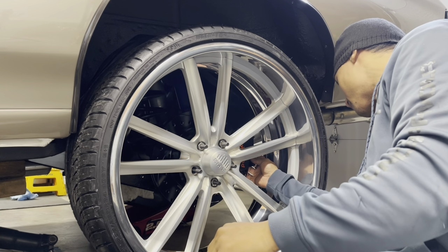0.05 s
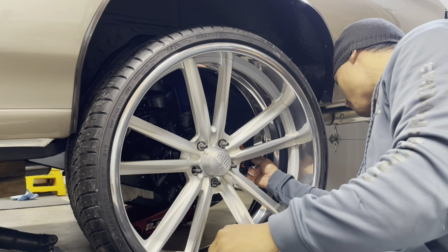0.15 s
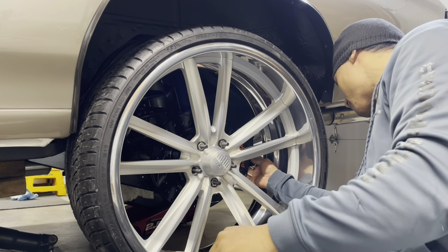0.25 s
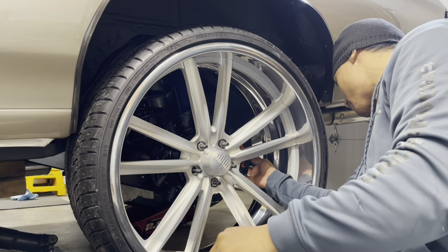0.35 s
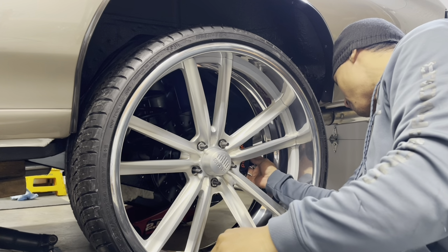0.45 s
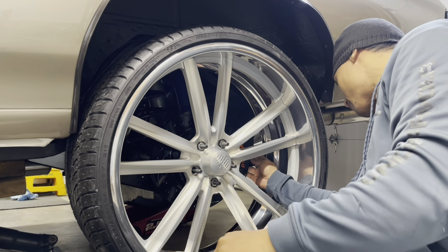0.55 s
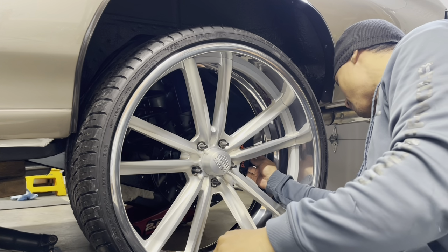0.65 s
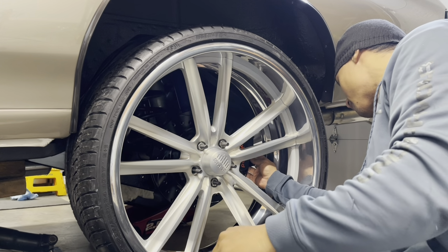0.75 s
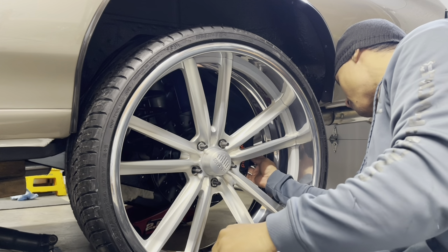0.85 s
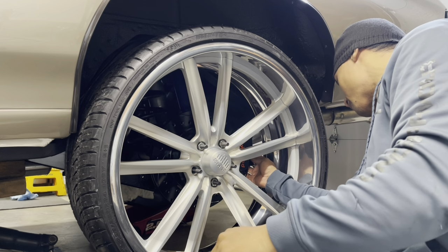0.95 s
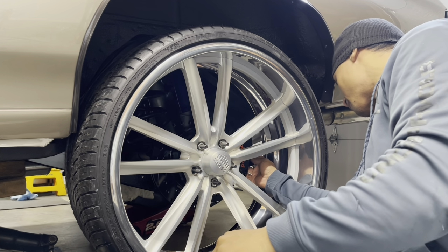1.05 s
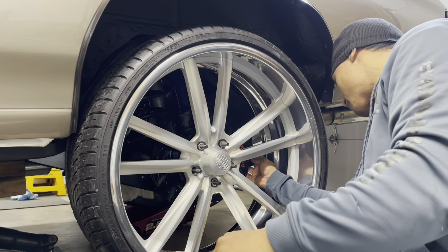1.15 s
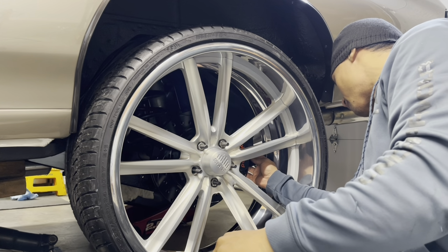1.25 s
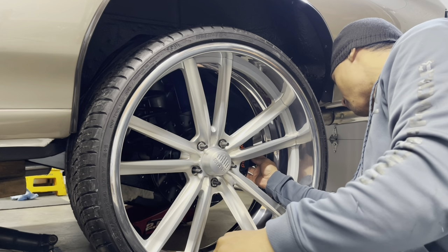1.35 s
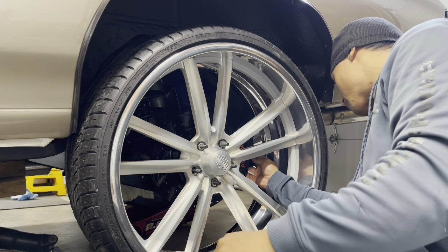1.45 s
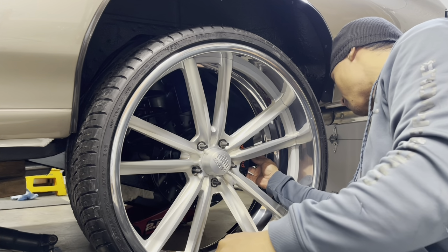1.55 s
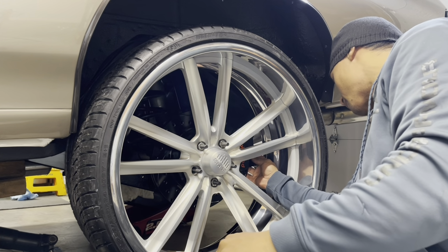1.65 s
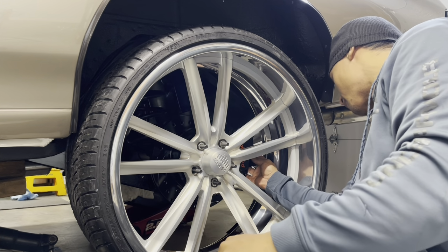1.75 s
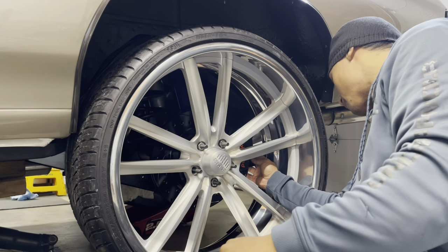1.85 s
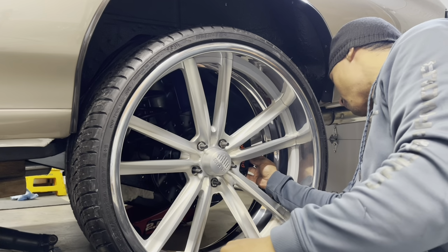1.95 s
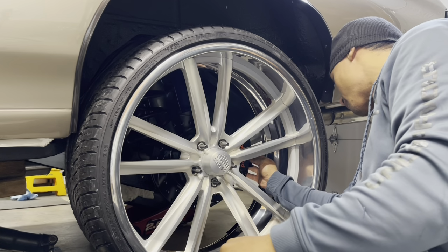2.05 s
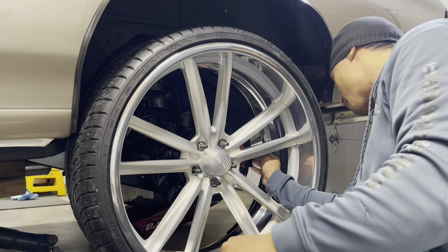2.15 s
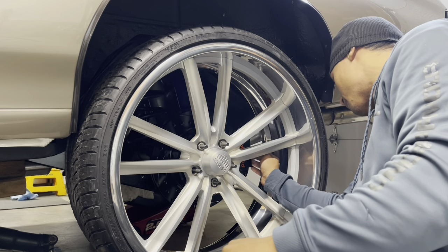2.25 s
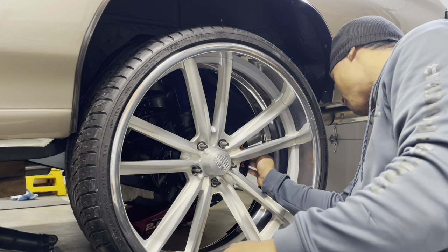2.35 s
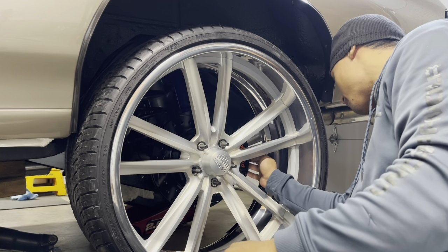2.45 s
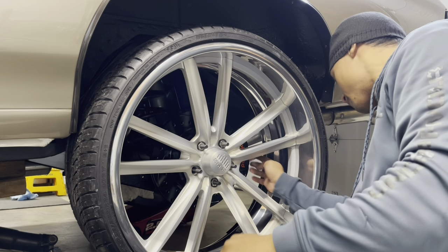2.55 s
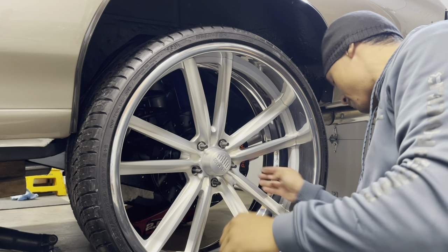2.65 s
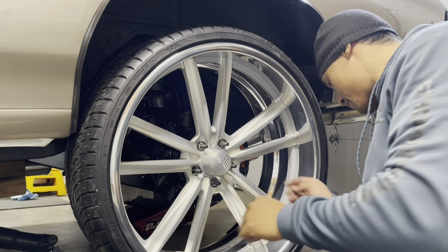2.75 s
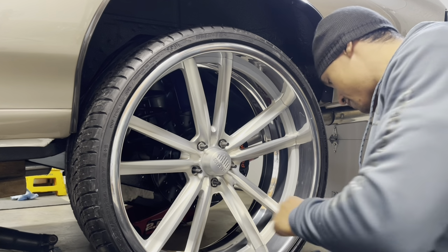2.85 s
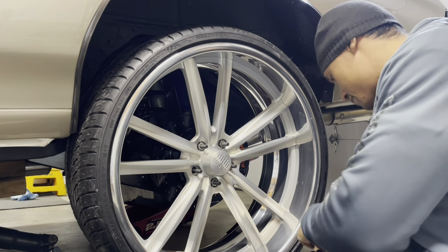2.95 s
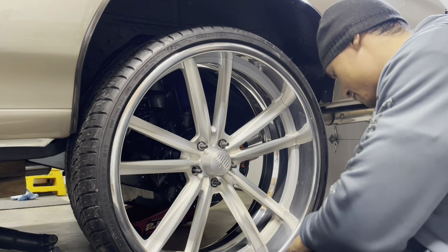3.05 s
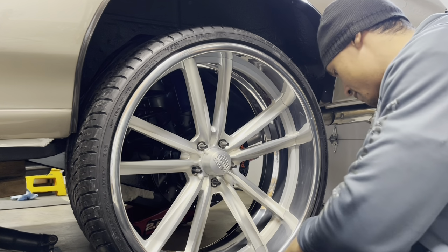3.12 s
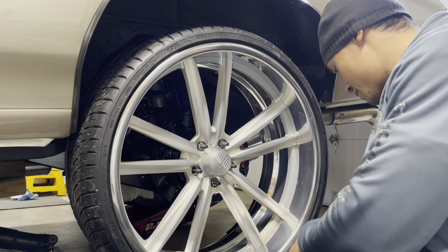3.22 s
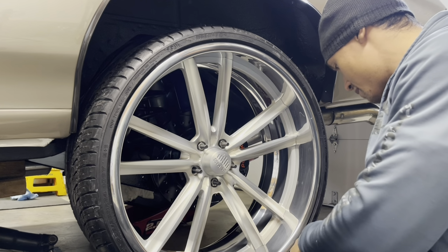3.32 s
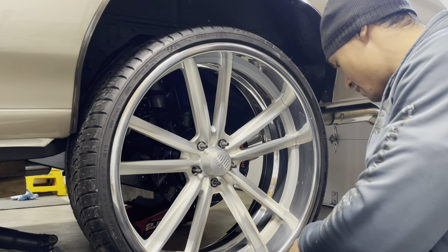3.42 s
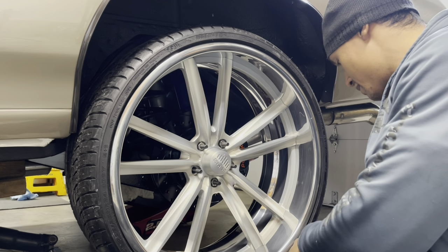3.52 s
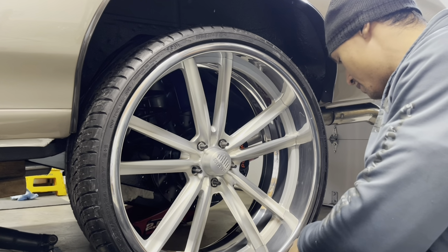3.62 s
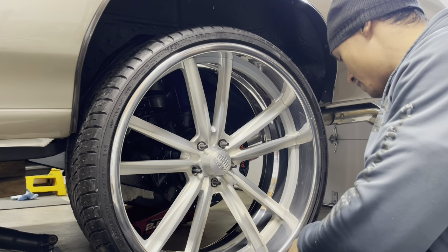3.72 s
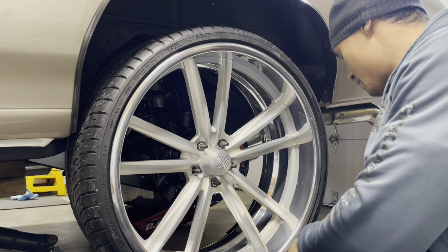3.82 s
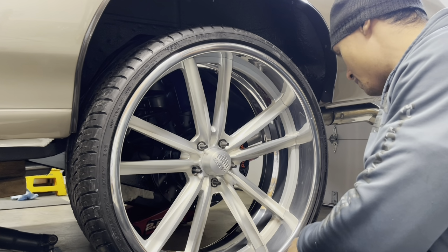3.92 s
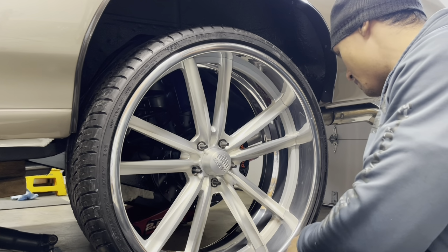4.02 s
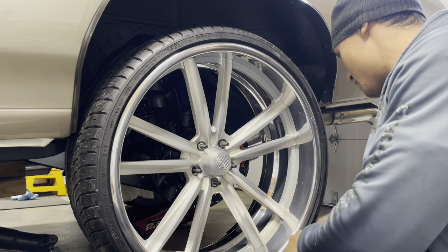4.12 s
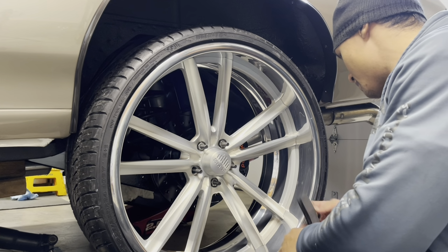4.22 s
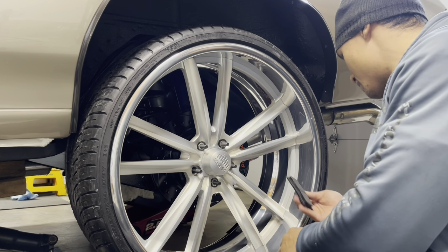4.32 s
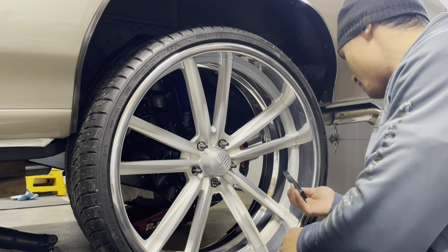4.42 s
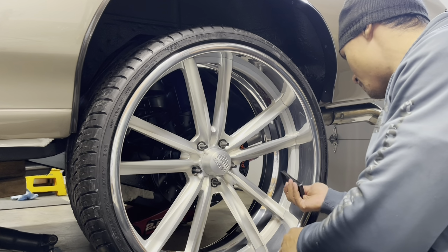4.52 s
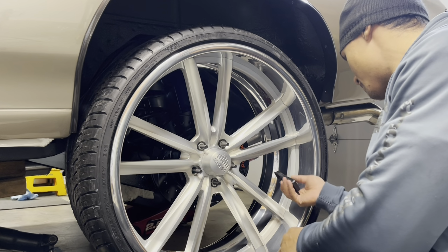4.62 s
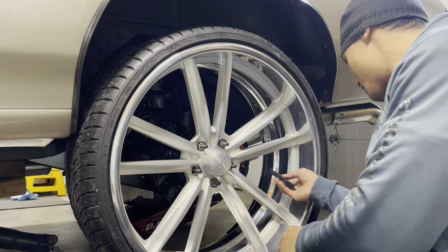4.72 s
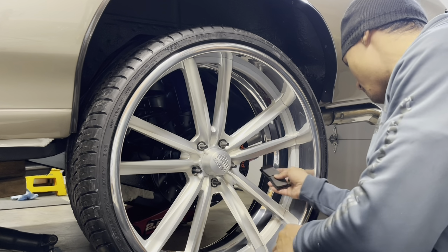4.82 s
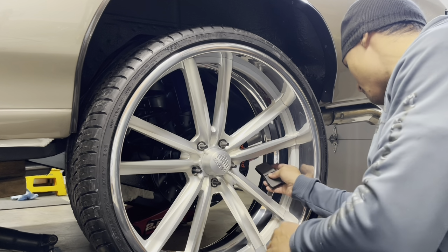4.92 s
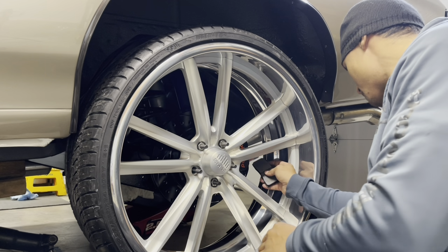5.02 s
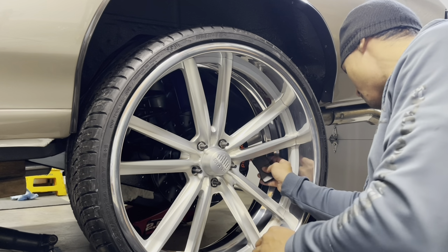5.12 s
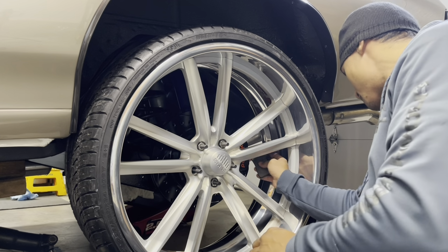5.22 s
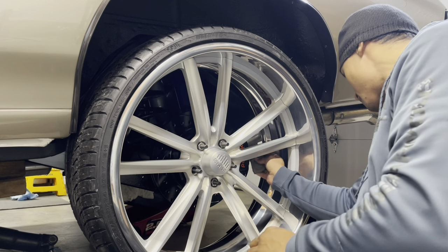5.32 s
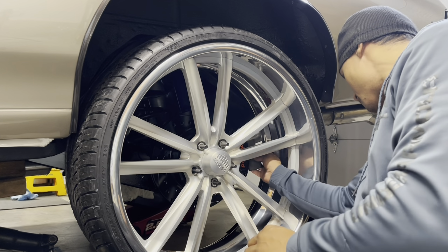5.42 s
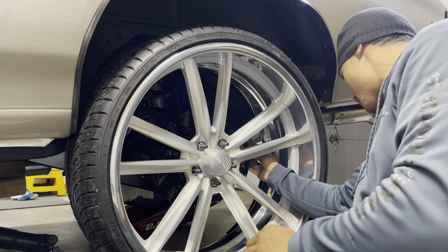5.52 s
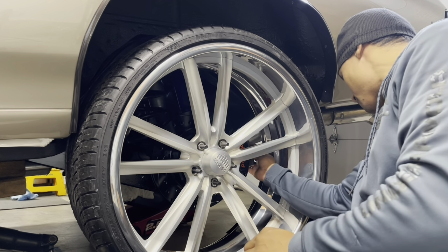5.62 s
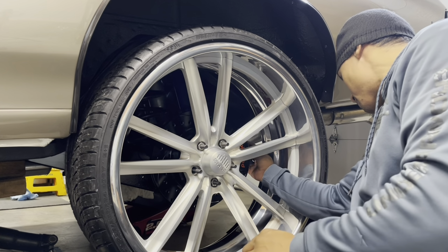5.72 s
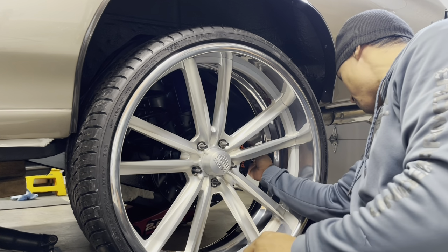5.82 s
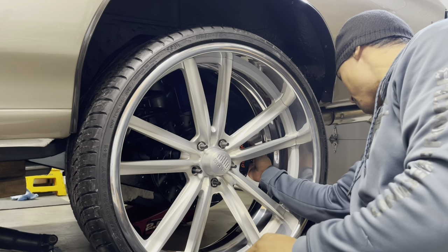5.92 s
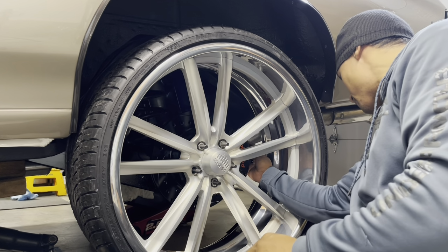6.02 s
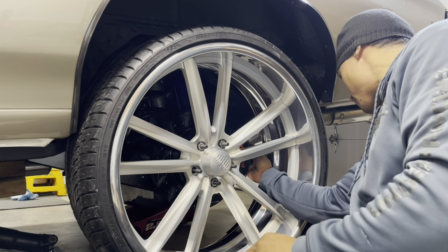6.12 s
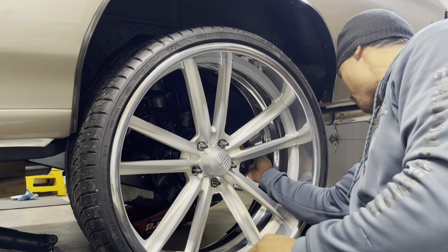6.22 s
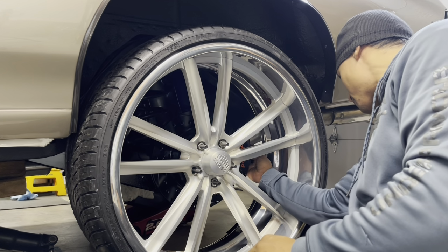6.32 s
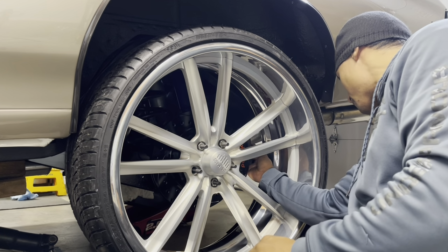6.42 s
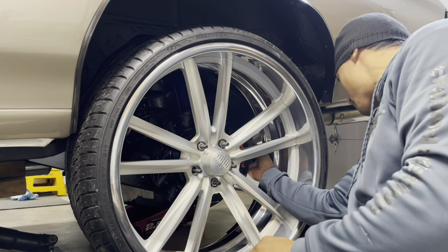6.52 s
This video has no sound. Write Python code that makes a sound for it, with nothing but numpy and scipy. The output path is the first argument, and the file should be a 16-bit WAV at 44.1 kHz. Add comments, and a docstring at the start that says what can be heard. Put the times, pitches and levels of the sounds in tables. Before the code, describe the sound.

In a quiet humming garage, metal parts tick and knock behind a wheel, ring out once loudly, rub softly, then clunk into place.

```python
"""A steel crack and a low drone over room hum, then knocks, thuds, clinks and rubs: a hand works brake
pads into a caliper behind a large alloy wheel in a quiet garage. Blows are noise bursts plus damped
modes; pushes swell the lowest disc mode; a heavy knock rings the wheel on its hub.
Sleeve, sliding pad and floor scrape are grainy filtered noise; the hum is shaped stereo noise."""
import sys
import numpy as np
from scipy import signal
from scipy.fft import rfft, irfft, next_fast_len
from scipy.io import wavfile
from scipy.ndimage import uniform_filter1d, map_coordinates

SR = 44100
rng = np.random.default_rng(int(sys.argv[2]) if len(sys.argv) > 2 else 0)


def put_to_file(sound):
    """Save the sound as 16-bit audio at rate SR, in the file named by the first command-line argument."""
    columns = np.atleast_2d(sound).T  # one column per channel
    safe = np.clip(columns, -1, 1)
    whole_steps = np.round(safe * 32767)
    wavfile.write(sys.argv[1], SR, whole_steps.astype(np.int16))


N = 289737


def amp(db):
    """dB to gain."""
    return 10 ** (np.asarray(db) / 20)


def unit(x):
    """x at rms 1."""
    return x / np.sqrt(np.mean(x ** 2) + 1e-20)


def along(points, hz):
    """Interpolate (frequency [Hz], value) points on a log frequency axis."""
    f, value = np.transpose(points)
    return np.interp(np.log(hz + 1), np.log(f + 1), value)


def filtered(x, response):
    """Multiply the spectrum of x by a complex response of frequency."""
    n = x.shape[-1]
    m = next_fast_len(n + 8192)
    hz = np.fft.rfftfreq(m, 1 / SR)
    return irfft(rfft(x, m) * response(hz), m)[..., :n]


def stroke(start_s, rise_s, hold_s, t60_s):
    """Envelope of peak 1: smooth swell, hold, exponential fade."""
    t = np.arange(N) / SR - start_s
    swell = np.sin(np.pi / 2 * np.clip(t / rise_s, 0, 1)) ** 2
    fade_time = np.clip(t - rise_s - hold_s, 0, None)
    return swell * amp(-60 * fade_time / t60_s)


def pair(n, spectrum, alike):
    """Diffuse stereo noise of rms 1: the mid/side balance sets the left-right likeness."""
    def mid_side(hz):
        turn = np.arccos(along(alike, hz)) / 2
        return amp(along(spectrum, hz)) * np.array([np.cos(turn), np.sin(turn)])

    mid, side = filtered(rng.standard_normal((2, n)), mid_side)
    return unit(np.array([mid + side, mid - side]))


# Room hum: (frequency [Hz], relative density [dB per Hz])
HUM_SPECTRUM = [(20, -38), (40, -11.5), (60, 0), (100, -6.5), (120, -3), (230, -9.5), (420, -13),
                (560, -18.5), (1150, -24.5), (1780, -27), (2400, -35.5), (3300, -42.5), (6000, -49.5),
                (9000, -50.5), (12500, -48)]
# Hum stereo: (frequency [Hz], left-right likeness [-1..1])
HUM_ALIKE = [(60, 0.94), (170, 0.94), (490, -0.092), (1390, 0.1), (3970, -0.2), (11300, -0.022)]
HUM_DB = -58


def room_hum():
    """Steady shaped noise, alike at both ports in the bass and diffuse above; slightly louder left."""
    return amp(HUM_DB) * pair(N, HUM_SPECTRUM, HUM_ALIKE) * amp([[.7], [-.7]])


# Port phase: (frequency [Hz], lead of the left port [rad])
PORT_LEAD = [(500, 0.72), (1800, 1.38), (2800, 0.85), (5000, 1), (7000, -0.3), (7900, -2.5), (9900, 6.5),
             (11500, -1.5)]


def ports(x):
    """Direct sound reaches the two microphone ports a little apart in time and level."""
    half_lead = np.array([[.5j], [-.5j]])
    return filtered(x, lambda hz: amp([[1.1], [-1.1]]) * np.exp(half_lead * along(PORT_LEAD, hz)))


# Room decay: (frequency [Hz], decay time t60 [s])
ROOM_T60 = [(200, 0.43), (1000, 0.26), (3000, 0.23), (7000, 0.3), (12000, 0.051)]
# Room tail stereo: (frequency [Hz], left-right likeness [-1..1])
ECHO_ALIKE = [(100, 0.87), (200, 0.7), (340, 0.8), (600, 0.25), (1200, 0.78), (3000, 0.071), (9000, 0.17)]


def garage(x, wet_db):
    """Convolve with a fresh diffuse tail; each frequency dies at its own speed."""
    noise = ports(pair(SR // 2, [(100, 0)], ECHO_ALIKE))
    hz, t, bins = signal.stft(noise, SR, nperseg=256)
    decay = amp(-60 * t / along(ROOM_T60, hz)[:, None])
    tail = signal.istft(bins * decay, SR, nperseg=256)[1]
    tail = np.pad(tail, ((0, 0), (180, 0))) / np.linalg.norm(tail[0])  # delay in samples
    return amp(wet_db) * signal.fftconvolve(x[None], tail, axes=1)[:, :len(x)]


def friction(envelope, spectrum, grain_db):
    """Rubbing: shaped noise of small uneven grains under the stroke."""
    unevenness = unit(uniform_filter1d(rng.standard_normal(N), size=90))
    grains = rng.standard_normal(N) * amp(grain_db * unevenness)
    return envelope * unit(filtered(grains, lambda hz: amp(along(spectrum, hz))))


# Sleeve strokes: (start [s], swell [s], fine hiss level [dB], duller rub level [dB])
SLEEVE_STROKES = [(2.599, 0.34, -76, -77.5), (3.639, 0.029, -72.5, -76), (4.071, 0.1, -79, -81.5),
                  (4.631, 0.22, -76.5, -71), (5.14, 0.15, -76.5, -78.5)]
# Cloth noise: (frequency [Hz], relative density [dB per Hz])
CLOTH = [(2000, -4), (4000, -7.5), (7000, -17), (9000, 6.5), (11000, 3.5), (12500, -18.5)]
SLEEVE_T60_S = 0.68


def sleeve():
    """The sleeve brushes the wheel: a fine hiss and a coarser, duller rub."""
    hiss, rub = sum(amp([[fine_db], [dull_db]]) * stroke(s, swell_s, 0, SLEEVE_T60_S)
                    for s, swell_s, fine_db, dull_db in SLEEVE_STROKES)
    dull_cloth = [(900, -22.5)] + CLOTH[:3] + [(9000, -42)]
    return friction(hiss, CLOTH[2:], grain_db=-1.0) + friction(rub, dull_cloth, grain_db=2.0)


# Pad dragged on concrete: (start [s], bite [s], level [dB])
SCRAPE = (3.14, 0.02, -61)
# Scrape noise: (frequency [Hz], relative density [dB per Hz])
GRIND = [(400, -17), (900, -1.5), (1150, -6.5), (1380, 0.5), (1700, -9.5), (2400, -9.5), (3240, -15),
         (6000, -24), (9000, -17), (12000, -29)]
SCRAPE_HOLD_S, SCRAPE_T60_S = 0.055, 0.59


def floor_scrape():
    """The pad bites the floor and drags: coarse grainy noise."""
    s, bite_s, db = SCRAPE
    drag = amp(db) * stroke(s, bite_s, SCRAPE_HOLD_S, SCRAPE_T60_S)
    return friction(drag, GRIND, grain_db=2)


# Pad slid along the disc: (start [s], swell [s], hold [s], level [dB])
SLIDES = [(3.226, 0.057, 0.19, -65), (5.132, 0.09, 0.056, -66.5)]
# Disc modes: (frequency [Hz], relative level [dB], decay time t60 [s])
DISC = [(791, -2, .06), (1020, -6, .07), (1791, 2, .13), (2400, -4, .04), (2665, -2, .08), (3650, -1, .1),
        (3828, -1, .09), (4760, -5, .08), (8100, -4, .08)]
SLIDE_T60_S, SLIDE_WIDTH_HZ, SLIDE_HISS_DB = 0.77, 80, -13


def pad_slide():
    """Friction noise makes three upper disc modes sing as resonances over a hiss."""
    def sings(f):
        modes = (DISC[2], *DISC[-2:])
        return amp(SLIDE_HISS_DB) + sum(amp(db) / (1 + 2j * (f - hz) / SLIDE_WIDTH_HZ) for hz, db, _ in modes)

    slide = sum(amp(db) * stroke(s, swell_s, hold_s, SLIDE_T60_S) for s, swell_s, hold_s, db in SLIDES)
    steel = friction(1, [(900, -31.5), (1700, 0), (4000, -10.5), (9000, -13.5), (11000, -24.5)], grain_db=-0.5)
    return slide * unit(filtered(steel, sings))


# Wheel on its hub: (frequency [Hz], level [dB], decay time t60 [s])
HUB_MODES = [(89.6, -42, 2.4), (92.7, -44, 2.0), (120, -36, 0.35), (146, -37.5, .5), (155, -23, .12),
             (250, -31, 0.23), (298, -35, 0.48), (326, -29, .15), (375, -32, .15)]
KNOCK_S = 2.325


def hub():
    """The heavy knock shakes the wheel; modes alternate in phase, so close ones beat."""
    t = np.clip(np.arange(N) / SR - KNOCK_S, 0, None)
    hz, db, t60_s = np.transpose(HUB_MODES)[..., None]
    sign = (-1) ** np.arange(len(HUB_MODES))[:, None]
    modes = sign * amp(db - 60 * t / t60_s) * np.sin(2 * np.pi * hz * t)
    return modes.sum(axis=0) * (1 - np.exp(-t / 0.0018))


# Pushes on the disc: (start [s], hold [s], level [dB], pitch [Hz])
PUSHES = [(-0.03, 0.0084, -35.5, 196.7), (0.776, 0.014, -46.5, 189.4), (0.869, 0.043, -51, 191),
          (0.97, 0.016, -48, 196), (1.283, 0.028, -45.5, 191.6), (1.813, 0.069, -45, 188.5),
          (1.918, 0.015, -43, 189), (2.284, 0.011, -35, 190), (2.328, 0.015, -32.5, 197),
          (2.485, 0.014, -42, 186.2), (2.551, 0.13, -52.5, 192.5), (5.638, 0.014, -46, 205.7),
          (5.706, 0.021, -50, 225), (5.762, 0.011, -39.5, 203), (5.786, 0.019, -42.5, 201),
          (6.26, 0.0022, -45, 204.4)]
# Hub and caliper shaken by a push: (frequency [Hz], relative density [dB per Hz])
SHUDDER = [(40, -12), (90, -1), (200, -17.5), (270, 1), (400, 1), (600, -19), (900, -46.5)]
PUSH_RISE_S, PUSH_T60_S = 0.0084, 0.39
SHUDDER_DB, SHUDDER_ALIKE = -12.5, 0.37  # level relative to drone; left-right likeness


def disc_drone():
    """Each push swells the lowest disc mode, roughened by the hand's grip, and shakes nearby parts."""
    t = np.arange(N) / SR
    drone = pressure = 0
    for s, hold_s, db, hz in PUSHES:
        push = amp(db) * stroke(s, PUSH_RISE_S, hold_s, PUSH_T60_S)
        pressure = pressure + push
        drone = drone + push * np.sin(2 * np.pi * hz * t)
    rough = unit(filtered(rng.standard_normal(N), lambda f: np.exp(-(f / 60) ** 2)))
    shudder = amp(SHUDDER_DB) * pressure * pair(N, SHUDDER, [(300, SHUDDER_ALIKE)])
    return np.sqrt(2) * drone * (1 + .5 * rough) + shudder


THUMP_S = .00015  # width of the push
FOCUS_DB, FOCUS_WIDTH_HZ = 3, 200  # rattle gathers round the strong modes


def crack(t, colour, t60_s, modes=(), thump=0):
    """Fast-dying coloured noise, the many modes too short to tell apart, led by any blunt push."""
    def response(f):
        peaks = sum(amp(db + FOCUS_DB) ** 2 / (1 + (2 * (f - hz) / FOCUS_WIDTH_HZ) ** 2) for hz, db, _ in modes)
        return amp(along(colour, f)) * np.sqrt(.5 + peaks)

    push = thump * np.exp(-((t - .002) / THUMP_S) ** 2)
    return filtered(rng.standard_normal(len(t)) + push, response) * amp(-60 * t / t60_s)


def ring(modes, t, colour, rough):
    """Damped modes driven by the blow's colour at their pitch, each throbbing unevenly."""
    hz, db, t60_s = np.transpose(modes)[..., None]
    db = db + along(colour, hz) + 1.5 * rng.standard_normal(hz.shape)
    knots = rng.standard_normal((len(hz), 2, 90)).transpose(0, 2, 1) @ [1, 1j]
    wander = np.array([map_coordinates(k, [t * 80], order=1) for k in knots])  # 80 knots per second
    throb = 1 + rough * (1 - np.exp(-t / .03)) * wander
    return (amp(db - 60 * t / t60_s) * (throb * np.exp(2j * np.pi * hz * t)).imag).sum(axis=0)


def add(out, s, x, wet_db):
    """Place a dry sound and its room tail at time s."""
    out[:, round(s * SR):][:, :len(x)] += ports(x) + garage(x, wet_db)


# Grit between steel faces: (time [s], colour at 8 kHz [dB], colour at 4 kHz [dB])
TICKS = [(0.6542, -54.5, -63), (0.7796, -41.5, -49.5), (0.9448, -56, -57), (1.163, -53.5, -106),
         (2.2737, -39.5, -56), (3.6674, -57, -57), (4.154, -56, -73.5)]
TICK_T60_S = 0.061


def grit_ticks():
    """Grit only cracks, in the treble."""
    out = np.zeros((2, N + SR))
    t = np.arange(SR // 4) / SR
    for s, top, high in TICKS:
        colour = [(1200, high - 29), (4200, high), (8500, top), (12000, top - 9)]
        add(out, s, crack(t, colour, TICK_T60_S), wet_db=-5.0)
    return out[:, :N]


# Modes of the other parts: (frequency [Hz], relative level [dB], decay time t60 [s])
CALIPER = [(1723, -4, .09), (1800, -5, .1), (2380, -3, .08), (2510, -2, .1), (2660, -4, .16),
           (3280, -6, .08), (3840, -6, .17), (5090, -6, .13), (6045, -7, .08), (6860, 4, .05),
           (6993, 0, .09), (8120, -4, .09), (8990, -8, .08)]
WHEEL = [(960, 2, .06), (1098, -37, 1.1), (1362, -28, 1.3), (1723, -23, .5), (2002, 11, .05),
         (2035, -35, .9), (2190, -31, .8), (2520, 0, .05), (2640, -1, .06), (3244, 12, .05), (3360, 5, .04),
         (3550, 6, .06), (2993, -25, .4), (3612, -27, 1.0), (3941, -25, .7), (5123, 4, .09),
         (5087, -25, .65), (5243, -23, .46), (5696, -25, .4), (9340, 1, .08)]
PAD = [(2573, 6, .15), (2640, 4, .13), (3553, -5, .22), (5300, -3, .05), (6800, -8, .1), (8005, -2, .1)]
BRACKET = [(371, -9, .25), (474, -11, .3), (1297, -10, .19), (1362, 1, .11), (2056, 5, .06), (2560, 7, .08),
           (3280, 1, .07), (3560, 5, .05)]
# Mode set: (modes, weak-mode wash relative to rattle [dB], wash t60 [s], 300 Hz relative to 650 Hz [dB])
PARTS = {"caliper": (CALIPER, -21, 0.12, -3), "disc": (DISC, -26, .15, -5.5),
         "wheel": (WHEEL, -37, 0.62, -3), "pad": (PAD, -12, 0.18, -6.5),
         "bracket": (BRACKET, -28.5, 0.41, -1.4)}
# Low dull thuds share the bracket's low modes; bright steel clinks near the floor share the caliper's
SOUNDS = {**PARTS, "thud": PARTS["bracket"], "clink": PARTS["caliper"]}
SOUND_AT_S = {3.2892: "clink", 3.3378: "clink", 3.582: "thud", 3.6408: "thud"}
# Blows: (time [s], mode set, colour at 650 Hz, 1.1, 2, 4 and 9 kHz [dB], rise [s], rattle t60 [s],
# ring relative to rattle [dB]); SOUND_AT_S names the thuds and clinks
BLOWS = [(0.0024, "disc", -31, -26.5, -29.5, -58, -49, 0.0013, 0.035, -12),
         (0.2436, "disc", -42, -39, -46, -92, -92, 0.0019, 0.018, -42),
         (0.4040, "caliper", -18, -17, -16, -31.5, -40.5, 0.0019, 0.023, -26),
         (0.763, "caliper", -18, -29, -35.5, -53, -67, 0.019, 0.075, -34),
         (0.9608, "disc", -20.5, -28, -28.5, -54, -60, 0.00133, 0.016, -13.5),
         (1.211, "disc", -69, -62, -50.5, -71, -69, 0.0044, 0.026, -11),
         (1.2881, "caliper", -18.5, -11.5, -11, -16.5, -17.5, 0.00062, 0.016, -26.5),
         (1.8898, "caliper", -29.5, -23.5, -29.5, -46, -52.5, 0.0027, 0.033, -23),
         (2.1533, "disc", -32, -28, -41.5, -63.5, -83.5, 0.0013, 0.046, -19.5),
         (2.25, "disc", -21, -32, -39.5, -51, -73.5, 0.022, 0.3, -17),
         (2.29, "wheel", -24.5, -23, -41.5, -49, -51.5, 0.002, 0.36, -32),
         (2.3204, "wheel", -12.5, -6, -9.5, -10.5, -13, 0.0011, 0.035, -17),
         (3.0122, "pad", -32.5, -43, -49, -70.5, -56.5, 0.00134, 0.077, -30),
         (3.2892, "caliper", -35, -25, -33.5, -43, -40.5, 0.0013, 0.05, -19),
         (3.3378, "caliper", -57, -31, -39, -47, -46.5, 0.0017, 0.054, -21),
         (3.5504, "pad", -37.5, -38.5, -45.5, -57.5, -77, 0.0016, 0.071, -20),
         (3.582, "bracket", -28.5, -40, -61.5, -74.5, -75, 0.002, 0.049, -30),
         (3.6408, "bracket", -27, -37, -55, -59, -64, 0.0013, 0.035, -29),
         (3.821, "pad", -48.5, -31, -43, -64.5, -46, 0.0022, 0.058, -29.5),
         (3.8323, "pad", -13, -17.5, -30, -38.5, -46, 0.00043, 0.059, -35.5),
         (3.8917, "pad", -43, -25, -31, -27.5, -35, 0.002, 0.031, -16),
         (4.0796, "pad", -48.5, -39.5, -44.5, -54, -40, 0.00091, 0.03, -26),
         (5.6407, "bracket", -32.5, -25, -32.5, -54, -64, 0.0052, 0.083, -8.5),
         (5.663, "bracket", -25.5, -20.5, -39, -69, -76, 0.0014, 0.085, -16.5),
         (5.76, "bracket", -14.5, -25.5, -39, -56.5, -54, 0.0045, 0.065, -29.5),
         (5.7905, "bracket", -12.5, -26, -30.5, -37.5, -83, 0.0031, 0.045, -20),
         (6.25, "bracket", -27.5, -21, -38, -59, -84, 0.005, 0.078, -15.5)]


def blows():
    """Each blow cracks and rings its set of modes; a soft landing rises slowly."""
    out = np.zeros((2, N + SR))
    for s, mode_set, low, body, mid, high, top, rise_s, t60_s, ring_db in BLOWS:
        sound = SOUND_AT_S.get(s, mode_set)
        modes, wash_db, wash_t60_s, bass_db = SOUNDS[sound]
        t = np.arange(SR if sound == "wheel" else SR // 2) / SR  # the wheel rings longest
        colour = [(40, low - 25), (120, low - 8), (300, low + bass_db), (650, low), (1100, body),
                  (2000, mid), (4200, high), (9500, top), (12000, top - 5)]
        rattle = crack(t, colour, t60_s, modes, thump=1.1)
        wash = amp(wash_db) * crack(t, colour, wash_t60_s, modes)
        rings = amp(ring_db) * ring(modes, t, colour, rough=.9)
        landing = 1 - np.exp(-t / rise_s)
        add(out, s, (rattle + wash) * landing, wet_db=-4.5)
        add(out, s, rings * landing, wet_db=-11)
    return out[:, :N]


def scene():
    """All sources in the garage."""
    rubs = sleeve() + floor_scrape() + pad_slide()
    rubbing = ports(rubs) + garage(rubs, wet_db=-10.5)
    low = (hub() + disc_drone()) * amp([[.6], [-.6]])  # slightly louder left
    return room_hum() + rubbing + low + grit_ticks() + blows()


# Microphone response: (frequency [Hz], gain [dB])
MICROPHONE = [(8000, 1.5), (9300, 9.5), (9900, -2), (10400, -2.5), (11400, -1.5), (12600, -20.5)]
TOP_HZ = 11950


def record(dry):
    """The microphone colours the top treble; nothing is kept from the band limit up."""
    return filtered(dry, lambda hz: amp(along(MICROPHONE, hz)) * (hz < TOP_HZ))


dry = scene()
out = record(dry)
put_to_file(out)
```